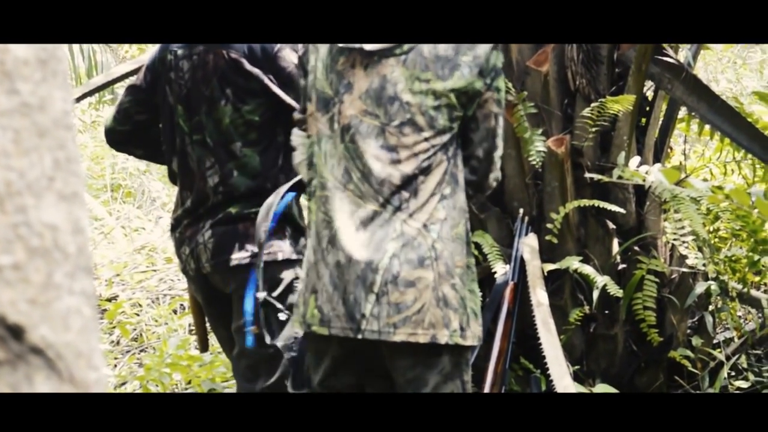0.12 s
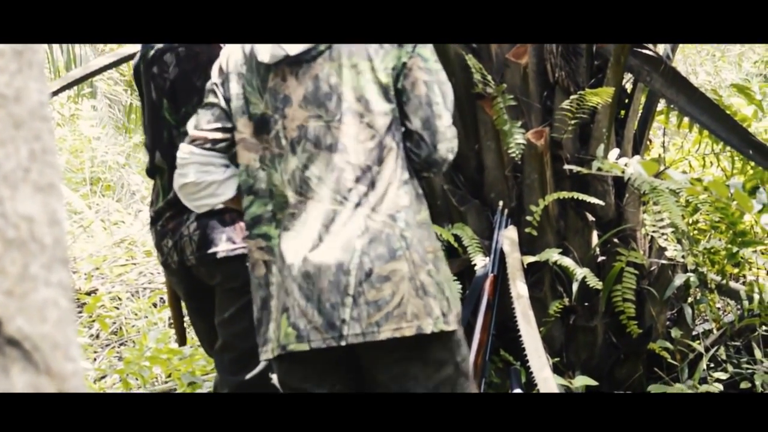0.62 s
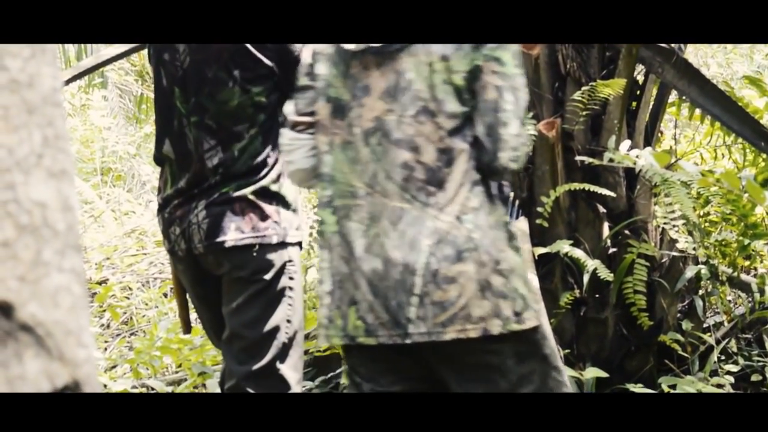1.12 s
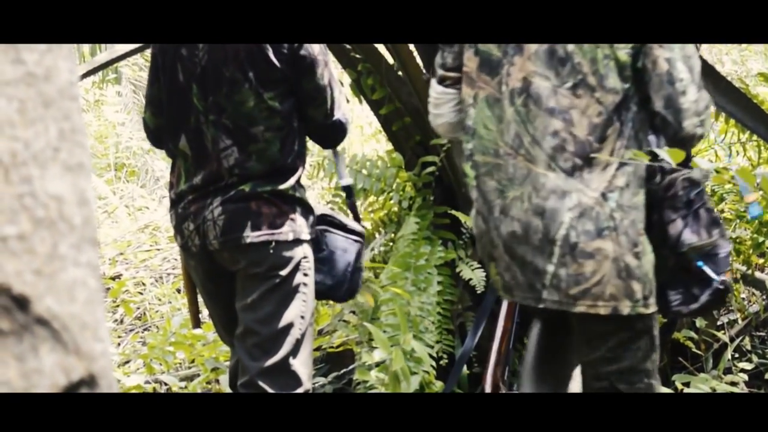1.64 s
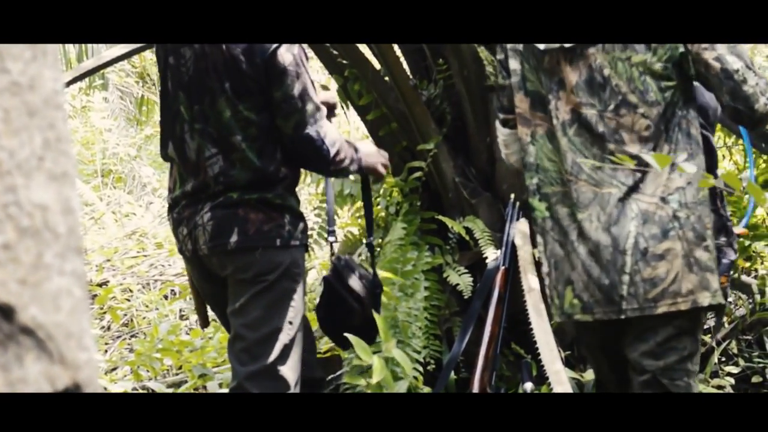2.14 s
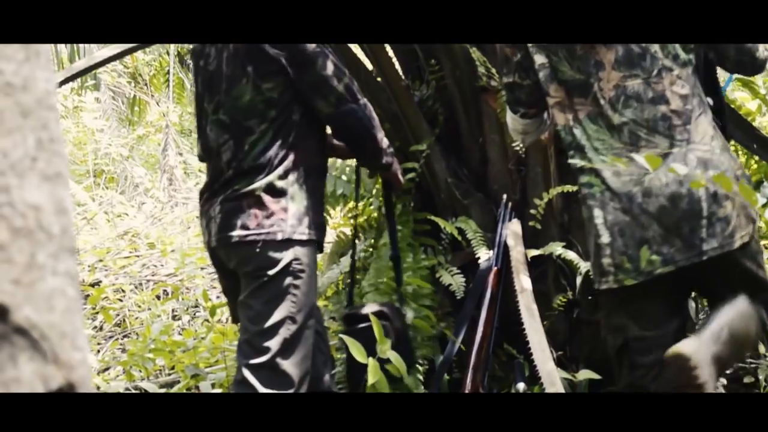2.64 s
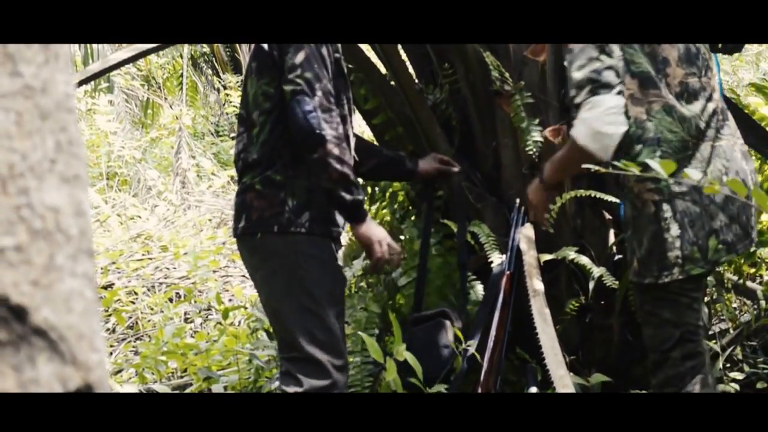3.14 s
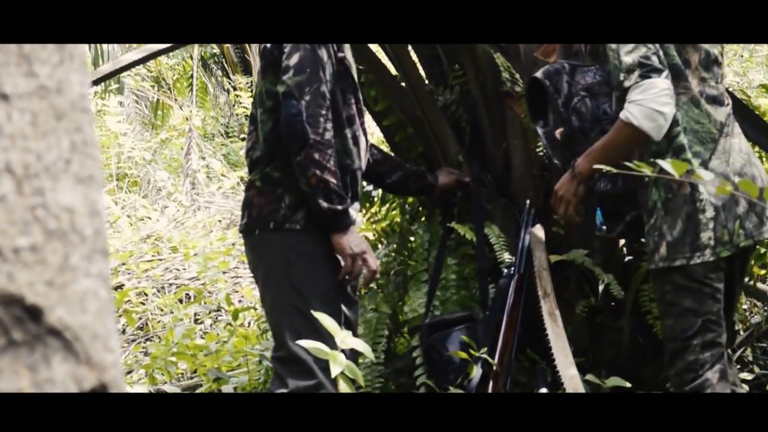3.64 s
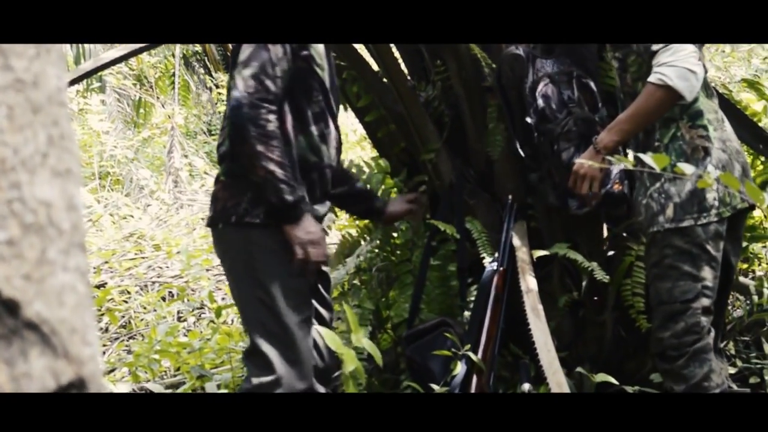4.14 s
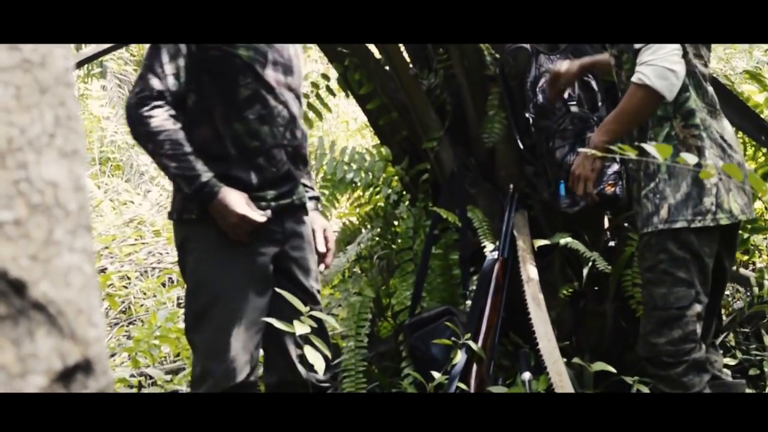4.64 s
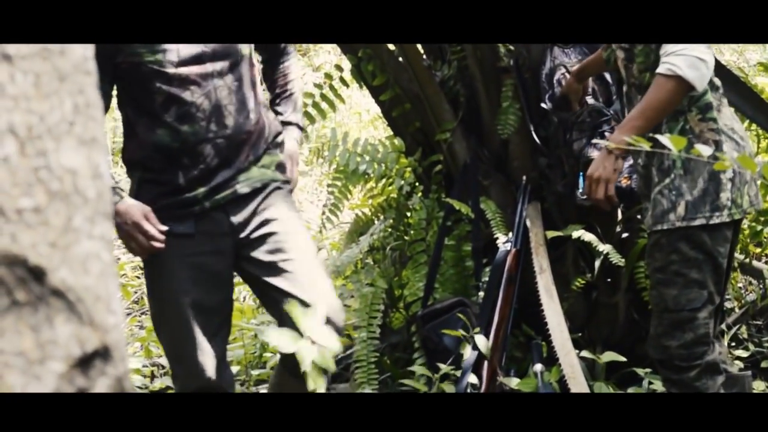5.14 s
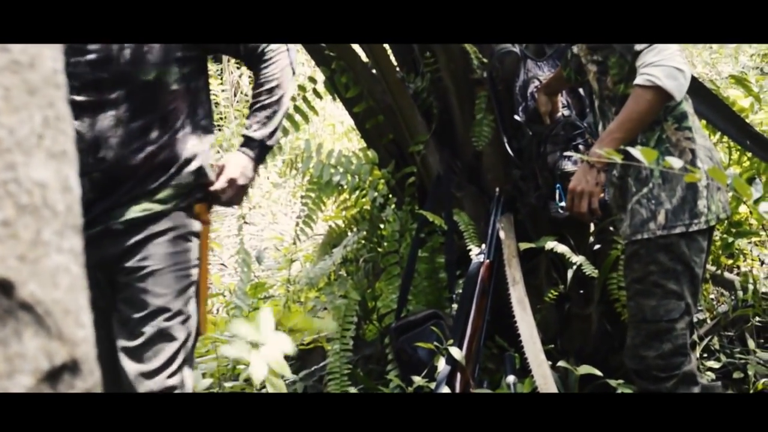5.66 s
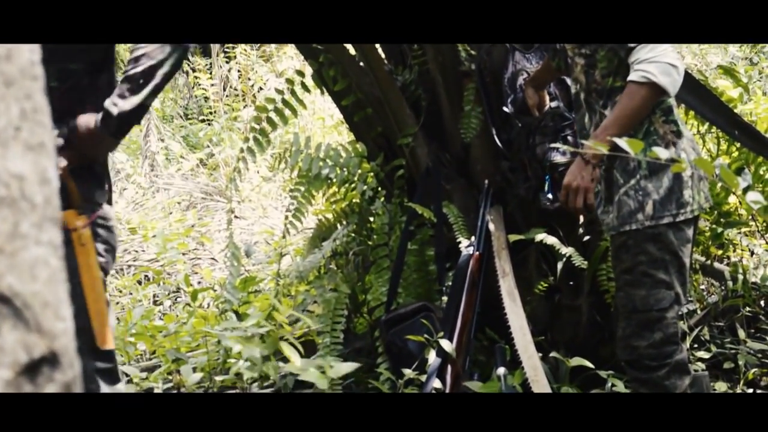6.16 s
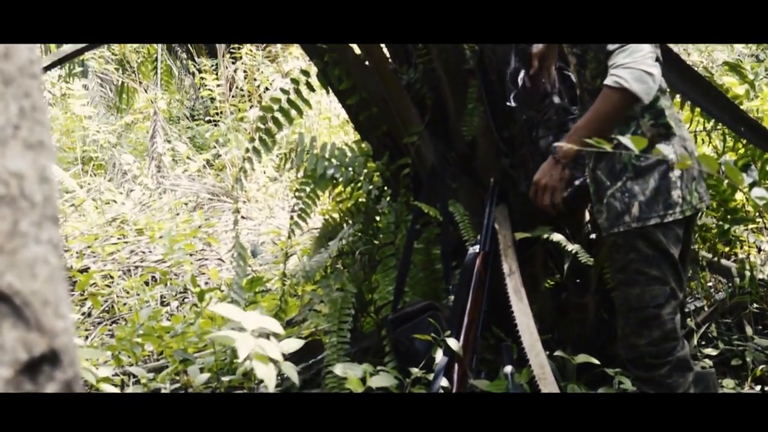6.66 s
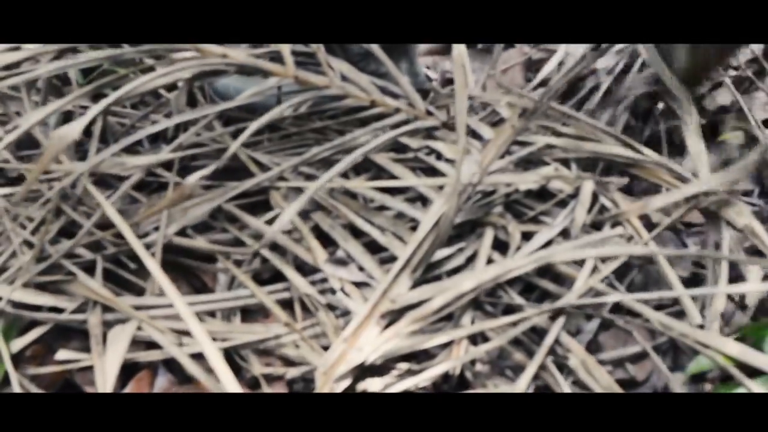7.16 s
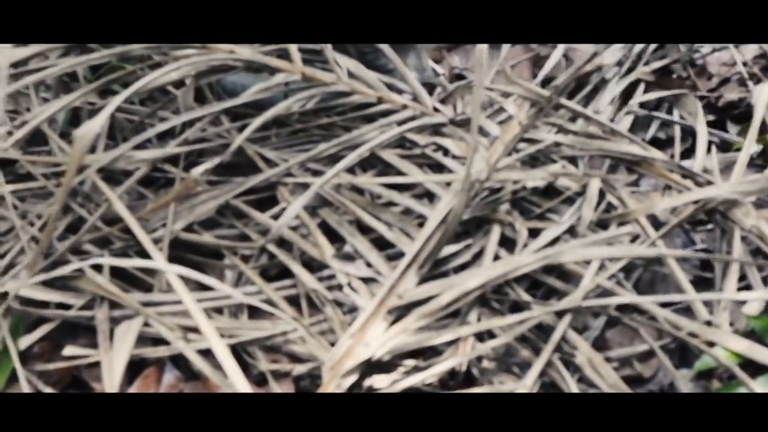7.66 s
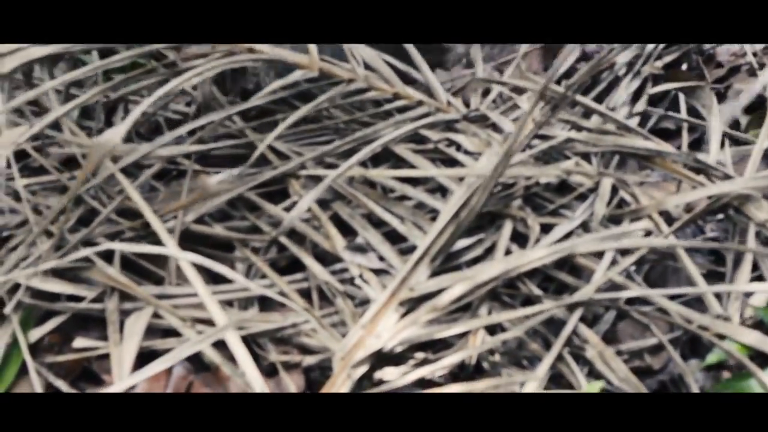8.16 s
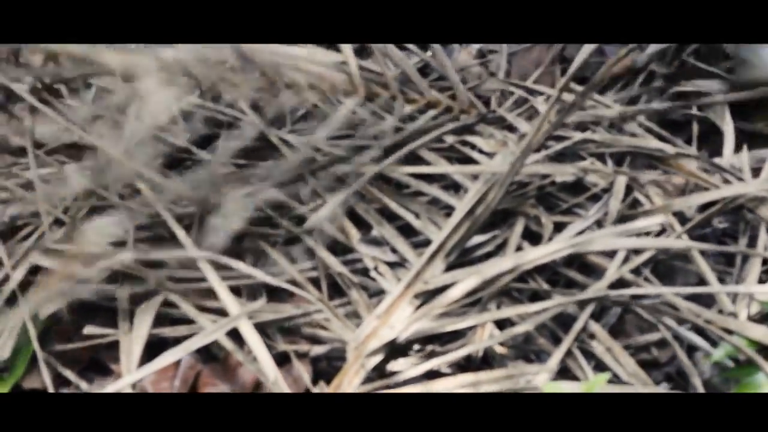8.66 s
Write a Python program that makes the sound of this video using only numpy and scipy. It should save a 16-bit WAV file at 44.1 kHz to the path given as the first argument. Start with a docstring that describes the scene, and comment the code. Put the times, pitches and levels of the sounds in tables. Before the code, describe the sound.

Two people shift about in green undergrowth: bright leafy swishes, scattered stalk snaps, a brief metallic ring and faint hollow bag scrapes. A sharp cluster of cracks comes midway, then softer rustling with faint insect ticks and a distant engine rev. Suddenly dry palm fronds are trodden very close in dense, bright, continuous crunching. Outdoor forest, dry, single channel, with soft hush and a distant low engine drone beneath.

```python
"""Forest undergrowth: two people move through it; leaves and cloth swish, stalks snap, a bag drags.
Then, much closer, dry palm fronds are trodden in a dense crunch; leaf noise is brightest near 10 kHz.
Leaves are clumped noise grains, snaps spikes with noise bursts and tails, knocks damped sines.
A metal part rings once as a beating pair; bag, cloth and insect ticks are gated resonant noise.
A far engine drones as wavering sines, a second revs briefly; the forest hush is coloured noise."""
import sys
import numpy as np
from scipy import signal
from scipy.fft import rfft, irfft, next_fast_len
from scipy.io import wavfile

SR = 44100
rng = np.random.default_rng(int(sys.argv[2]) if len(sys.argv) > 2 else 0)


def magnitude_from_level(level_db):
    """Linear magnitude for a level in decibels (20 dB per decade)."""
    exponent = np.asarray(level_db, float) / 20
    return 10 ** exponent


def bounce(signal):
    """Save signal as a 16-bit WAV file at the path given by the first command-line argument."""
    frames = np.transpose(np.atleast_2d(signal))
    limited = np.clip(frames, -1, 1)
    pcm = np.round(limited * 32767).astype(np.int16)
    wavfile.write(sys.argv[1], SR, pcm)


N = 387717  # samples

# leaf band centres, treble, top, middle, low: centre_hz
BAND_CENTRES_HZ = [9500, 14500, 3300, 800]
# leaf colour as the microphone hears it: freq_hz, density_db
LEAF_SPECTRUM = [(120, -25.5), (200, -6.5), (420, -10), (700, -4.5), (2000, -4), (4200, -1.5), (7400, -3),
                 (9800, 1.5), (12000, -7.5), (14400, -17.5), (15700, -20), (16300, -49)]
# swishes through green leaves; rise or fall under 0.01 counts as 0.01:
# peak_s, treble_db, rise_s_per_20db, fall_s_per_20db, middle_re_treble_db
SWISHES = [(0.167, -32, .045, 0.1749, -6.5), (.255, -32, -0.04, 0.01, -8), (.351, -49, 0.2, -0.03, -1),
           (.489, -55, .04, .06, 2), (0.663, -37, 0.04, 0.22, -4), (.985, -43, -0.13, 0.05, -18),
           (1.109, -33, .1, .2, -6), (1.153, -38, 0.03, 0.03, -0.5), (1.317, -48, -0.3, 0.4, -1),
           (1.449, -39, 0.09, 0.17, -6), (1.78, -52, 0, 0.07, 2.5), (2.0, -43.5, 0.1, 0.4, -7.5),
           (2.197, -37, 0.18, 0.14, -6.5), (2.3, -41, 0.16, 0.45, -8), (2.43, -45, 0.55, 0.25, -4),
           (2.54, -40, 0.04, 0.17, -8), (2.778, -53, 2, 0, -14), (3.11, -49, 0.14, 0.8, -6.5),
           (3.193, -37, 0.05, 0.05, -6), (3.271, -39, 0.04, 0.12, -12), (3.5, -45.5, 0.24, 0.86, -4),
           (3.887, -49.5, 0.9, 0.7, -5), (4.009, -50.5, 0.7, 0.4, -6), (4.119, -53.5, -0.9, 1.5, -4.5),
           (4.272, -47, .15, 0.3, -5), (4.48, -45, 0.13, .2, -4.5), (5.009, -43, -0.16, .5, -8),
           (5.162, -38, 0.31, 0.06, -11.5), (5.44, -51, 0.1, 2, -12), (5.598, -37, 0.04, 0.16, -1),
           (5.721, -40, -0.09, 0.04, -3), (5.838, -48, 0.4, -0.06, -5.5), (6.002, -41.5, .17, .11, -6),
           (6.248, -37.5, 0.02, .15, -3), (6.356, -37, -0.01, -0.34, -14), (6.445, -38.5, 0.19, .17, -5.5),
           (6.723, -34.5, 0.11, .16, -4), (6.84, -40, -0.3, 0.13, -8.5), (6.964, -45.5, 0.2, .12, 0.5),
           (7.068, -46.5, .1, 20, -14)]
# faint stirring between swishes: time_s, treble_db
STIR = [(0, -57), (1.5, -61.5), (2.7, -58), (3.7, -62.5), (4.7, -55.5), (5.5, -61.5), (7.1, -54.5),
        (8.79, -65)]
# stirring in top, middle, low: re_treble_db
STIR_BANDS_DB = [-13, -6.5, -3.5]
# dry fronds trodden close by: time_s, treble_db, middle_re_treble_db
CRUNCH = [(7.153, -38, -18), (7.172, -23.5, -15), (7.202, -35.5, -8), (7.261, -26, -6.5),
          (7.373, -32.5, -7.5), (7.55, -32, -6.5), (7.677, -26.5, -8.5), (7.72, -27, -8.5),
          (7.79, -26.5, -4), (7.84, -32, -8), (7.88, -26.5, -9), (7.92, -31.5, -6.5), (8.016, -33.5, -7.5),
          (8.181, -32.5, -11.5), (8.24, -37.5, -5), (8.285, -28.5, -6.5), (8.333, -30.5, -5),
          (8.389, -27, -8.5), (8.445, -34, -9), (8.65, -31.5, -9), (8.71, -33, -7), (8.788, -27, -10)]
# breaking stalks, nominal peaks:
# start_s, treble_peak_db, top_re_treble_db, middle_re_treble_db, low_re_treble_db
SNAPS = [(0.1205, -31, -25, 0, -2), (0.1466, -29.5, -26, 9.5, -22), (0.4763, -26, -30, -2, -0.5),
         (0.5506, -38, -20, 7, -18), (.5646, -27, -24, -15, -27), (.5806, -29, -30, -19, -21),
         (.627, -27.5, -26, 5.5, -18), (0.7524, -21, -36, -1, -31), (0.772, -22.5, -21, -3, -22),
         (0.827, -16.5, -34, -11, -13), (.9248, -32, -26, 4, 10), (1.0087, -14, -5, -38, -35),
         (1.0598, -18.5, -27, -9, -24), (1.0784, -16, -21, -5.5, -33), (1.1171, -23, -13, 9.5, -2),
         (1.15, -2.5, -10, -23, -40), (1.3037, -15.5, -17, -6.5, -18), (1.4502, -22, -25, -8, -28),
         (1.7375, -36.5, -21, 7, -17), (1.948, -26, -29, -18, -31), (2.18, -21.5, -66, 3.5, -38),
         (2.2677, -21, -19, -31, -19), (2.386, -33, -21, 8.5, 3), (2.524, -17, -20, -17.5, -28),
         (2.5402, -26, -5, 7, -29), (2.547, -4.5, -1, -12, -41), (2.7587, -24.5, -15, -17, -20),
         (2.9183, -29.5, -2, -4, -31), (3.089, -30, -20, -8, -25), (3.1515, -20, -22.5, -6, -29.5),
         (3.269, -14, -16, -14, -29), (3.2892, -10.5, 1.5, -10.5, -25), (3.419, -17, -2, -18, -23),
         (3.4546, -7.5, -7, -6.5, -24), (3.4748, 2.5, -22, -30, -45), (3.4962, -3.5, -3, -7.5, -36),
         (3.503, 5.5, -4, -18, -40), (3.5673, 4.5, -5, -7, -29.5), (3.5744, 8.5, -7, -11, -39),
         (3.6365, -16, -40, -5, -43), (3.8839, -26.5, -18.5, -1, -14), (3.9901, -23.5, -34, 3, -26),
         (4.0969, -28, -25, -22, -2.5), (4.216, -34, -23, 2, -22), (4.2686, -21.5, -2, -6, -9),
         (4.276, -20.5, -8, -3, -19), (4.5075, -19.5, -31.5, -11, -23), (4.722, -33, -11, 0.5, -2),
         (5.1, -21, -29, -10, -11), (5.1477, -18, -23, -25, -26), (5.583, -21, -30, 0, -27),
         (5.8471, -28, -19, -15, -23), (5.918, -21.5, -20, -18, -13), (6.227, -26, -13, 4, -7),
         (6.347, -16, -20, -20, -15), (6.42, -22, -20, -1, -5.5), (6.4355, -23, -26, -5, -8),
         (7.058, -17.5, -28, -22, -36), (7.1564, -14, -20, -16, -40), (7.164, 6, -11, -19.5, -32.5),
         (7.167, -4, -10, -27, -24), (7.1777, -7, -16, -7, -35), (7.215, -17, -22, -22, -18),
         (7.262, -1.5, -4, -34, -15), (7.36, -18.5, -20, -12, 1.5), (7.403, -.5, -7, -16.5, -35),
         (7.411, -17, -26, -36, -31), (7.4986, -4, -6, -34, -18.5), (7.5333, -6, -34, -8.5, -22),
         (7.5787, -18.5, -20, -1, 1), (7.657, -4, -18, -14, -19), (7.6905, -14, -24, 2, -7),
         (7.7356, -3.5, -3, -21, -27), (7.7485, -4, -26, -16, -25), (7.7832, -1.5, -21, -30, -35),
         (7.8069, -1.5, -3, -19, -34), (7.866, -8, -24, -1, -22), (7.872, -2.5, -25, -5, -17.5),
         (7.9376, -7, -3, -5, -33), (7.9572, -8, -1, -4.5, -25), (8.0494, -9.5, -28, -5, -22),
         (8.0723, -13.5, -19, -4, -11), (8.111, -16, -24, -27, -30), (8.1615, -13, -27, -29, -32),
         (8.1958, -8.5, -9, -32, -20), (8.2442, -1.5, -19, -12.5, -20.5), (8.272, -2, -16, -15.5, -41),
         (8.332, -5.5, -21, -5.5, -19), (8.375, -2, -14, -25, -30), (8.3955, -8, -15, -22, -32),
         (8.4055, .5, -11, -26, -39), (8.4673, -11, -23, -16, -31), (8.515, -9, -20, -30, -33),
         (8.628, -12, -10, -19, -34), (8.6748, -9, -8, -20, -27), (8.7001, 1, 4.5, -36, -24),
         (8.726, -2.5, -26, -14, -14), (8.749, -12, -24, -15, -12)]
# snap burst decay, one per leaf band: t60_s
CRACK_T60_S = [0.02, 0.013, 0.023, 0.028]
# scattered snap tail decay, one per leaf band: t60_s
TAIL_T60_S = [0.29, 0.27, 0.16, 0.42]
# dull knocks on stalks and ground: start_s, peak_db, pitch_hz, t60_s
KNOCKS = [(.917, -34.5, 670, 0.021), (.918, -32, 1560, 0.026), (1.159, -37, 1420, 0.11),
          (2.549, -34.5, 1535, 0.062), (3.164, -37.5, 257, 0.077), (3.575, -34.5, 246, 0.087),
          (3.887, -45, 662, .04), (4.008, -37, 670, 0.033), (4.28, -44, 560, 0.08),
          (3.99, -30.5, 4830, .012), (5.821, -36, 1470, 0.021), (6.436, -37.5, 690, 0.048),
          (6.552, -31, 2160, 0.0057), (6.944, -33, 1800, 0.012), (8.701, -22.5, 3470, 0.018),
          (8.727, -15, 1620, 0.012), (8.728, -36, 704, 0.0092), (8.729, -20, 4200, 0.015)]
# ringing metal part: start_s, level_db, pitch_hz, beat_hz, t60_s, damped_after_s
METAL_RING = [(.92, -41, 2223, 26, .9, .078)]
# rattling hard stalk: start_s, initial_db_rms, pitch_hz, width_hz, t60_s
STALK_RATTLES = [(2.545, -20.5, 4040, 506, 0.065), (2.55, -42, 4020, 302, 0.46)]
# hollow bag dragged over stalks: start_s, length_s, level_db
DRAGS = [(0.71, 0.24, -57.5), (1.231, 0.035, -52.5), (1.287, .3, -56.5), (1.604, 0.04, -53),
         (2.598, 0.114, -55), (4.518, .03, -47.5), (4.684, 0.11, -53), (4.825, .07, -57.5),
         (4.948, 0.036, -53), (5.088, 0.056, -53)]
# bag resonances: pitch_hz, width_hz, level_re_drag_db
BAG_RESONANCES = [(750, 110, -3), (1037, 180, -1), (1420, 180, -4), (1780, 190, -12)]
# cloth and straps scuffing: start_s, length_s, pitch_hz, width_hz, level_db
SCUFFS = [(4.425, 0.025, 2020, 400, -42.5), (4.44, .078, 3565, 900, -50.5)]
# insect ticks: start_s, length_s, pitch_hz, width_hz, level_db
INSECTS = [(1.53, 0.017, 15000, 150, -82), (4.02, .03, 14900, 150, -62), (4.117, .025, 10160, 200, -42),
           (4.094, 0.039, 8700, 200, -48), (4.12, 0.151, 13600, 130, -61), (4.56, .05, 14040, 149, -62),
           (4.634, 0.11, 11700, 300, -57.5), (4.745, 0.12, 11800, 300, -58), (4.88, 0.112, 11800, 300, -64),
           (6.615, .015, 9000, 199, -57), (4.853, 0.038, 13600, 120, -62), (5.346, 0.036, 15000, 120, -62),
           (6.618, .04, 13870, 120, -63)]
# far engine drone: time_s, pitch_hz, level_db
DRONE = [(0.0, 65.4, -62), (0.07, 63.95, -55), (0.22, 63.7, -56), (2.2, 64.2, -55), (2.32, 62.6, -54),
         (5.29, 62.6, -56), (5.51, 61.3, -56), (6.66, 61.2, -53), (7.93, 61.5, -63.5), (8.79, 60.8, -63)]
# rough partials of the drone: time_s, then one level_db per multiple
PARTIALS = [(0.0, -52.5, -76, -62), (1.44, -60, -77.5, -66), (2.4, -63.5, -82, -60.5),
            (4.1, -62, -67.5, -65), (4.9, -63, -60, -60.5), (6.5, -68, -72, -61), (7.1, -64.5, -59.5, -70),
            (8.79, -63.5, -55, -66)]
# partial pitch re drone pitch: multiple
PARTIAL_MULTIPLES = [1.38, 2.02, 4.26]
# brief rev of a second engine: time_s, third_order_hz, level_db
REV = [(4.2, 125, -67), (4.34, 128, -60.5), (4.65, 150, -60.5), (5.121, 152, -59), (5.256, 148, -56),
       (5.35, 135, -73)]
# orders of the rev: order, level_re_rev_db
REV_ORDERS = [(2, -2), (3, 0.5), (4, -6)]
# steady forest hush: freq_hz, density_db
FOREST_SPECTRUM = [(15, -45), (25, -18), (44, -8), (66, -4.5), (157, -6), (212, -11), (270, -7),
                   (394, -13.5), (734, -13.5), (2550, -21), (3160, -20), (7310, -21.5), (9570, -24),
                   (14800, -26), (16000, -32)]


def rms_one(x):
    """Scale to rms 1."""
    return x / np.sqrt(np.mean(x ** 2) + 1e-20)


def in_time(rows, t):
    """Interpolate the columns after the first over times t in s."""
    time_s, *columns = np.transpose(rows)
    return [np.interp(t, time_s, column) for column in columns]


def colour(x, spectrum):
    """Causal minimum-phase filter, built by folding the cepstrum; dB over log frequency."""
    size = 4096
    hz, db = np.transpose(spectrum)
    grid_hz = np.maximum(np.arange(size // 2 + 1) * SR / size, 1)
    log_gain = np.interp(np.log(grid_hz), np.log(hz), db) * np.log(10) / 20
    cepstrum = irfft(log_gain)
    cepstrum[1:size // 2] *= 2
    cepstrum[size // 2 + 1:] = 0
    impulse = irfft(np.exp(rfft(cepstrum)))
    return signal.fftconvolve(x, impulse)[:N]


def drift(rate_hz):
    """Slow random curve of rms 1: noise through two equal poles, at every 40th sample."""
    r = np.exp(-2 * np.pi * rate_hz * 40 / SR)
    noise = rng.standard_normal(N // 40 + 2002)
    slow = signal.lfilter([1], [1, -2 * r, r * r], noise)[2000:]  # settled part
    return np.interp(np.arange(N) / 40, np.arange(len(slow)), rms_one(slow))


def dying(clicks, t60_s):
    """Each click starts an exponential decay."""
    return signal.lfilter([1], [1, -magnitude_from_level(-60 / (t60_s * SR))], clicks + 1e-18)


def whistle(hz, width_hz):
    """Noise passed twice through one resonance; rms 1."""
    r = np.exp(-np.pi * width_hz / SR)
    poles = [1, -2 * r * np.cos(2 * np.pi * hz / SR), r * r]
    once = signal.lfilter([1, 0, -1], poles, rng.standard_normal(N))
    return rms_one(signal.lfilter([1], poles, once))


def gated(rows, edge_s, flutter_db):
    """Resonant noise, one gate a row, with a common flutter."""
    t = np.arange(N) / SR
    noises = {pitch: whistle(*pitch) for pitch in dict.fromkeys(row[2:4] for row in rows)}
    out = np.zeros(N)
    for start_s, length_s, hz, width_hz, db in rows:
        gate = np.clip(np.minimum(t - start_s, start_s + length_s - t) / edge_s, 0, 1)
        out += magnitude_from_level(db) * noises[hz, width_hz] * gate
    return magnitude_from_level(flutter_db * drift(70)) * out


def leaf_bands(x):
    """Leaf colour split into four overlapping bands; unit white noise gives rms 1 in each."""
    size = next_fast_len(N)
    log_hz = np.log(np.arange(size // 2 + 1) * SR / size + 1)
    knots = np.log(np.sort(BAND_CENTRES_HZ))
    response = np.abs(rfft(colour(np.arange(N) == 0, LEAF_SPECTRUM), size))
    spectrum = rfft(colour(x, LEAF_SPECTRUM), size)
    bands = []
    for hz in BAND_CENTRES_HZ:
        share = np.interp(log_hz, knots, knots == np.log(hz))
        band_rms = np.sqrt(np.mean((response * share) ** 2))
        bands.append(irfft(spectrum * share, size)[:N] / band_rms)
    return bands


def movement():
    """Leaf strength per band: powers of stir, swishes and the later close crunch add."""
    t = np.arange(0, N + 64, 64) / SR
    stir_db, = in_time(STIR, t)
    power = magnitude_from_level(stir_db + np.c_[[0] + STIR_BANDS_DB]) ** 2
    for peak_s, db, rise_s, fall_s, middle_db in SWISHES:
        rising = (peak_s - t) / max(rise_s, 0.01)
        falling = (t - peak_s) / max(fall_s, 0.01)
        shape_db = db - 20 * np.maximum(rising, falling)
        power += magnitude_from_level(shape_db + np.c_[[0, -14.5, middle_db, -17]]) ** 2
    db, middle_db = in_time(CRUNCH, t)
    begun = np.clip((t - CRUNCH[0][0]) / 0.0083, 0, 1)  # onset ramp, s
    power += (begun * magnitude_from_level([db, db - 10.5, db + middle_db, db - 16.5])) ** 2
    return [np.interp(np.arange(N) / SR, t, np.sqrt(p)) for p in power]


def rustle():
    """Leaf cracks in random clumps, each a short noise burst, on the hiss of sliding leaves."""
    births_per_s, grain_t60_s = 500, 0.007  # births before clumping
    spread_db, hiss_db, clump_db, patchy_db = 6, 4, 2.5, 1.42
    clumps = magnitude_from_level(clump_db * drift(25))
    parts = []
    # thin leaves: treble, top; thick leaves, at other moments: middle, low
    for bands in (slice(0, 2), slice(2, 4)):
        born = rng.random(N) < births_per_s * clumps / SR
        heights = magnitude_from_level(spread_db * np.minimum(rng.exponential(1, N), 3.1))
        cracks = dying(born * heights, grain_t60_s)
        envelope = rms_one(rms_one(cracks) + magnitude_from_level(hiss_db))
        parts += leaf_bands(envelope * rng.standard_normal(N))[bands]
    out = np.zeros(N)
    for part, gain in zip(parts, movement()):
        out += part * gain * magnitude_from_level(patchy_db * drift(14))
    return out


def snaps():
    """A stalk breaks: a spike, a short burst, then a tail scattered by stems and leaves."""
    burst_re_peak_db, spike_re_burst_db = -13.5, 11
    start_s, peak_db, *others_db = np.transpose(SNAPS)
    at = np.round(start_s * SR).astype(int)
    even_noise = rng.choice([-1, 1], N)
    tail_noise = rng.standard_normal(N)
    out = np.zeros(N)
    for k, band_db in enumerate([0] + others_db):
        crack, tail = np.zeros((2, N))
        burst_db = peak_db + band_db + burst_re_peak_db
        crack[at] = magnitude_from_level(burst_db)
        tail[at] = magnitude_from_level(burst_db - 16 + 0.024 * peak_db)  # relatively stronger after loud snaps
        sound = magnitude_from_level(spike_re_burst_db) * crack
        sound = sound + dying(crack, CRACK_T60_S[k]) * even_noise
        sound = sound + dying(tail, TAIL_T60_S[k]) * tail_noise
        out += leaf_bands(sound)[k]
    return out


def knocks():
    """One damped sine mode a knock."""
    out = np.zeros(N)
    for start_s, db, hz, t60_s in KNOCKS:
        at = round(start_s * SR)
        t = np.arange(min(N - at, SR // 4)) / SR
        out[at:at + len(t)] += magnitude_from_level(db - 60 * t / t60_s) * np.sin(2 * np.pi * hz * t)
    return out


def metal_ring():
    """A close pair of metal modes beats until a hand damps it."""
    (start_s, db, hz, beat_hz, t60_s, damped_s), = METAL_RING
    t = np.maximum(np.arange(N) / SR - start_s, 0)
    pair = np.sin(2 * np.pi * hz * t) - 0.35 * np.sin(2 * np.pi * (hz + beat_hz) * t)
    damping_db = 1500 * np.maximum(t - damped_s, 0)  # 1500 dB/s
    return magnitude_from_level(db - 60 * t / t60_s - damping_db) * pair


def stalk_rattles():
    """A hard stalk rattles on: decaying noise in one broad resonance a row."""
    out = np.zeros(N)
    for start_s, db, hz, width_hz, t60_s in STALK_RATTLES:
        click = magnitude_from_level(db) * (np.arange(N) == round(start_s * SR))
        out += dying(click, t60_s) * whistle(hz, width_hz)
    return out


def bag_drags():
    """Every drag excites all resonances of the hollow bag, each wandering in strength."""
    out = np.zeros(N)
    for hz, width_hz, own_db in BAG_RESONANCES:
        rows = [(start_s, length_s, hz, width_hz, db + own_db) for start_s, length_s, db in DRAGS]
        out += magnitude_from_level(2.5 * drift(8)) * gated(rows, edge_s=0.013, flutter_db=0.5)
    return out


def cloth_scuffs():
    """Cloth and straps rub: short fluttering bands of noise."""
    return gated(SCUFFS, edge_s=0.015, flutter_db=2)


def insects():
    """High ticks: short narrow bands of noise."""
    return gated(INSECTS, edge_s=0.0065, flutter_db=1.5)


def engine_drone():
    """Far engine: a low sine wavering in level and phase, with rough partials."""
    t = np.arange(N) / SR
    hz, db = in_time(DRONE, t)
    phase = 2 * np.pi * np.cumsum(hz) / SR
    out = np.sqrt(2) * magnitude_from_level(db + 2.2 * drift(2.7)) * np.sin(phase + 0.18 * drift(9.0))
    for multiple, db in zip(PARTIAL_MULTIPLES, in_time(PARTIALS, t)):
        out += magnitude_from_level(db + 1.96 * drift(1.56)) * np.sin(multiple * phase + 0.91 * drift(4.4))
    return out


def engine_rev():
    """A second engine revs briefly: sines at low orders of its turning rate."""
    before = (REV[0][0] - 0.1, REV[0][1], -100)
    after = (REV[-1][0] + 0.04, REV[-1][1], -100)
    third_order_hz, db = in_time([before] + REV + [after], np.arange(N) / SR)
    turns = np.cumsum(third_order_hz / 3) / SR
    orders = np.zeros(N)
    for order, order_db in REV_ORDERS:
        orders += magnitude_from_level(order_db + 3.1 * drift(11.2)) * np.sin(2 * np.pi * order * turns)
    return np.sqrt(2) * magnitude_from_level(db) * orders


def forest_hush():
    """Coloured noise, its level drifting slowly about -53 dB."""
    gain = magnitude_from_level(-53 + 2.1 * drift(1.6))
    return gain * rms_one(colour(rng.standard_normal(N), FOREST_SPECTRUM))


def scene():
    """Sum of all sources, one channel."""
    hush = forest_hush()
    leaves = rustle()
    handling = snaps() + knocks() + metal_ring() + stalk_rattles() + bag_drags() + cloth_scuffs()
    far = insects() + engine_drone() + engine_rev()
    return (hush + leaves + handling + far)[None]


def low_pass(x):
    """Removes everything above the highest recorded frequency."""
    return signal.sosfilt(signal.butter(12, 16430, fs=SR, output="sos"), x)


def record(dry):
    """Peaks clip at 0.99 of full scale."""
    mix = np.clip(dry, -0.99, 0.99)
    return low_pass(mix)


dry = scene()
out = record(dry)
bounce(out)
```